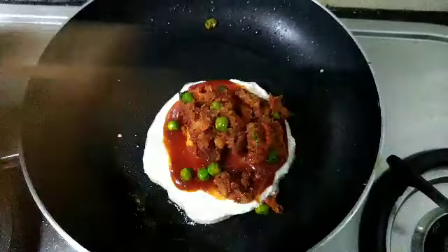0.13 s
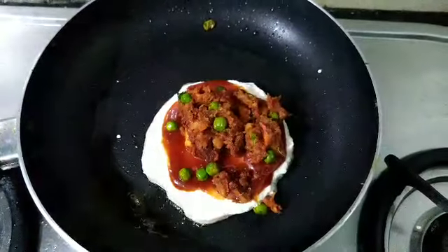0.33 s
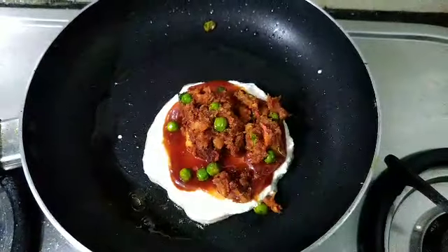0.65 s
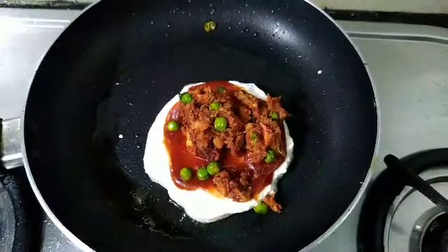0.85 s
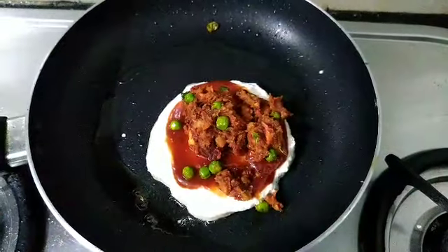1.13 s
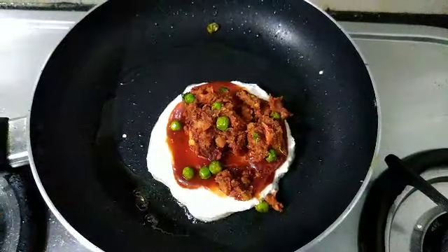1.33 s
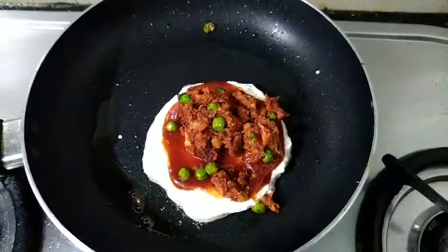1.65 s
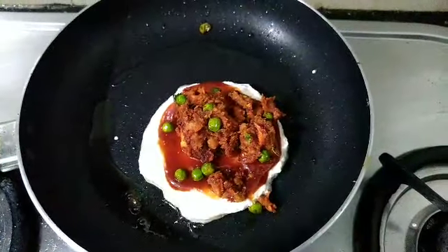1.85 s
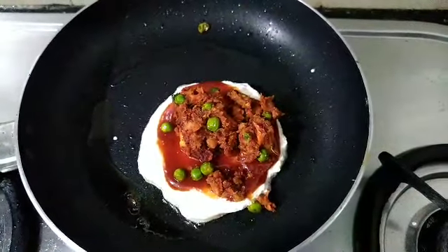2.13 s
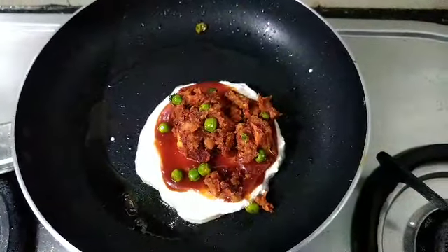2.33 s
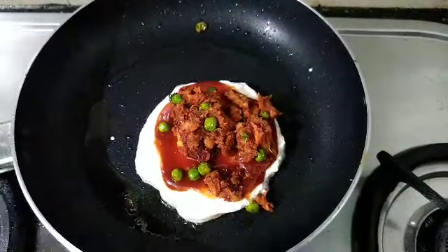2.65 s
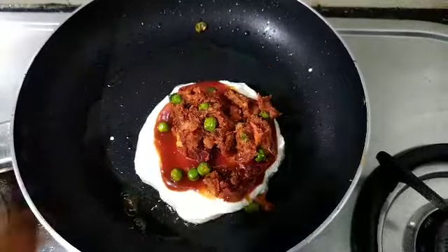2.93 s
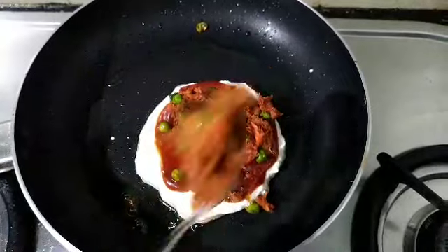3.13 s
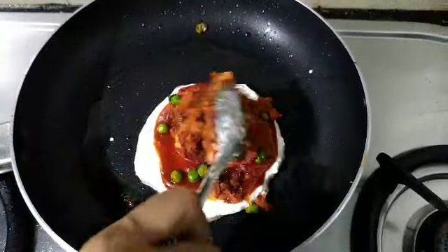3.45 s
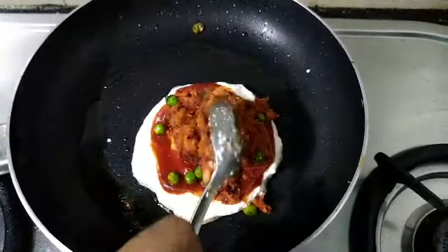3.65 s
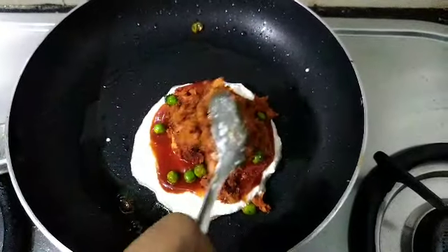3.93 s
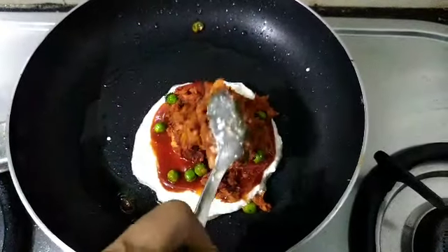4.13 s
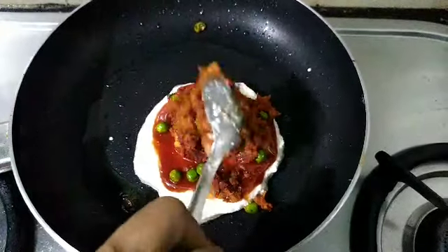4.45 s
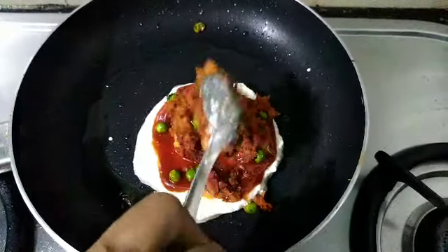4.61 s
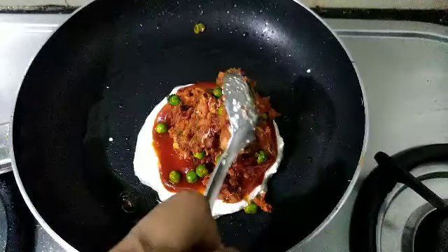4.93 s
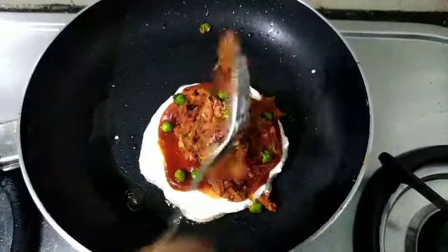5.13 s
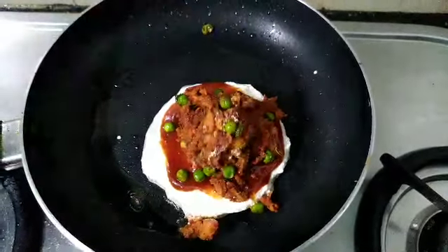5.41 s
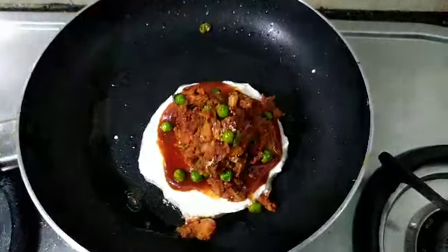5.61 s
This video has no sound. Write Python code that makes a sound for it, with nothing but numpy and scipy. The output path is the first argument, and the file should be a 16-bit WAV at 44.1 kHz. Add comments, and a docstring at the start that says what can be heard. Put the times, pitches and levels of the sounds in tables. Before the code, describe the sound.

Close, bright frying crackle with irregular oil pops, small steam hisses and occasional dull knocks over faint kitchen room rumble.

```python
"""Sharp snaps and sprays of tiny crackles: batter with a moist filling fries close under a phone in a small kitchen.
Water trapped in the oil of a nonstick pan bursts in clicks and random crackle; bubbles and the pan ring with it.
Steam puffs from under the batter as noise and a hollow pitch, and two jets hiss at its edge.
A few dry taps, filtered pulses, sound as the filling is put on and pressed down.
Behind lie noise as room rumble, a faint hum of wavering sines and some hollow blips."""
import sys
import numpy as np
from scipy import signal
from scipy.fft import rfft, irfft, next_fast_len
from scipy.io import wavfile
from scipy.ndimage import uniform_filter1d

SR = 44100
rng = np.random.default_rng(int(sys.argv[2]) if len(sys.argv) > 2 else 0)


def to_wav(s):
    """Save 16-bit WAV."""
    ch = np.atleast_2d(s).T  # columns
    pcm = np.round(np.clip(ch, -1, 1) * 32767)  # PCM
    wavfile.write(sys.argv[1], SR, pcm.astype(np.int16))


N = 254898
TIME = np.arange(N) / SR

# larger water droplets bursting in the oil:
# start_s, snap_peak_db, spray_db (relative), coarse_crackle_db (relative to the spray)
LARGE_DROPLETS = [(0.0024, -19, -32.0, -15), (0.072, -17, -36.5, -4), (0.199, -14, -25.5, -8.5),
                  (0.2622, 0, -32.5, -10), (0.3846, -10, -32.0, -13), (0.4012, -9.5, -35, -16),
                  (0.4455, -9, -34, -7), (0.4846, -3.5, -37, -16), (0.5389, -18, -36.5, -26),
                  (0.566, -14, -41, -8.5), (0.5882, -24, -37, -2), (0.6325, -14, -39, -12.0),
                  (0.6467, -9, -39.5, -15), (0.7129, -25, -38.5, -12), (0.7429, -17, -29.5, -14.0),
                  (0.818, -12, -35.0, -5), (0.8338, -7, -27, -6.5), (0.8833, -16, -31.0, -11),
                  (0.949, -17, -37, -9), (0.9591, -6.5, -32.5, -9), (1.0264, -13.0, -29.5, -19),
                  (1.049, -15, -29.5, -11.5), (1.1139, -14, -34.5, -10), (1.1491, -6.5, -35, -10),
                  (1.2634, -17.0, -44, -25), (1.2794, -15, -31.5, -16), (1.3117, -12, -31, -9.5),
                  (1.3732, -1.5, -35, 0), (1.4509, -19.0, -37.0, -7.0), (1.4803, -26, -34.5, -2.5),
                  (1.554, -4.5, -34, -5.5), (1.6393, -13.5, -34.5, -12), (1.7588, -14.5, -35.5, -9),
                  (1.8017, -14.5, -32.5, -14.5), (1.8725, -5.0, -27, -4), (1.925, -14.5, -33.5, -8.5),
                  (1.9513, -5.5, -31.5, -11), (2.0309, -12, -32.5, -13), (2.1171, -8, -32.5, -15),
                  (2.1602, -13.5, -34, -4), (2.2047, -9, -31.5, -8), (2.2174, -5, -31, -7.5),
                  (2.311, -27, -32.5, -13), (2.3868, -11.5, -42.5, -10), (2.4142, -8.5, -29.5, -8),
                  (2.478, -9.5, -30.5, -13), (2.5776, -13, -29, -13.5), (2.6228, -5, -33.5, -5.5),
                  (2.7227, -11, -29, -23.5), (2.7654, -12, -33, -13.5), (2.815, -9, -33.0, -15),
                  (2.8633, -9, -29.5, -8.5), (2.9524, -29.5, -31, -9.5), (2.9624, -5, -46, -17.5),
                  (3.0816, -12.5, -33.5, -15.0), (3.1343, -23, -27, -20), (3.1945, -4.5, -31.5, -7.5),
                  (3.2686, -14.5, -36.5, -27), (3.321, -5.0, -35.5, -30), (3.3824, -19, -39.5, -15),
                  (3.45, -27, -33.5, -21), (3.5079, -12, -32.5, -21), (3.5886, -22, -35.5, -17),
                  (3.6858, -12, -32.5, -17.5), (3.745, -18, -35.0, -16), (3.9346, -19, -36, -21),
                  (4.0904, -15, -29, -15.5), (4.1541, -5, -30.5, -10), (4.214, -8, -28.5, -14.5),
                  (4.2893, -14.5, -36, -15.5), (4.3573, -9, -30, -13.5), (4.3934, -6, -36, -29),
                  (4.4542, -18, -38.5, -4), (4.4851, -9.5, -38.5, -7), (4.5913, -15, -34, -10.5),
                  (4.6217, -13, -33, -6), (4.6516, -16, -35.5, -4.5), (4.6948, -11, -33, -2.5),
                  (4.7505, -21, -27.5, -12), (4.8515, -19, -31, -13.5), (4.8737, -17.5, -32, -8.5),
                  (4.9651, -23, -38.5, -11.5), (4.9817, -2.5, -29.5, -9), (5.0342, -12, -35, -16),
                  (5.1127, -24.5, -33.5, -21), (5.1982, -4.5, -25, -6.5), (5.3526, -25, -28.5, -29),
                  (5.373, -7.5, -24.5, -21), (5.4007, -11.0, -38, -7), (5.4141, -2.5, -41, 4.5),
                  (5.4791, -7.5, -29.0, -11), (5.5166, -24, -33, -9), (5.6318, -16, -28, -9.5),
                  (5.7001, -30, -30.5, -10.5), (5.7384, -25, -29.5, -8)]
# colour of the coarse crackle: frequency_hz, density_db (per Hz, relative)
COARSE_COLOUR = [(1200, -12.5), (2000, -38.5), (2400, -5.5), (2900, 3.5), (3200, -12.5), (4200, 1),
                 (5400, 6.5), (6400, 5.5), (8000, 11.5), (12000, -44)]
# colour of a snap: frequency_hz, density_db (per Hz, relative)
SNAP_COLOUR = [(1500, -36), (3000, -24.5), (6000, -12.5), (9000, 3), (12000, 0.5), (15000, -4)]

PORT_LAG_S = .00025  # greatest lag between the ports, for a sound from the rim
PORT_PHASE = np.array([[1.5], [0]])  # radians: standing waves in the room meet the ports out of step
PAN_DB = -2  # left over right
SHADE_DB = -14.5  # the left port faces away from the pan


def undb(db):
    """Amplitude ratio of a level in dB."""
    return 10 ** (np.asarray(db) / 20)


def unit(x):
    """Scale to rms 1."""
    return x / np.sqrt(np.mean(x ** 2))


def colour(x, points):
    """Causal minimum-phase filter with the given (Hz, dB) outline."""
    hz, db = np.transpose(points)
    size = 2048
    grid = np.maximum(np.arange(size // 2 + 1) * SR / size, 1)
    cepstrum = irfft(np.log(undb(np.interp(np.log(grid), np.log(hz), db))))
    # folding the cepstrum forward in time makes the response causal
    cepstrum[1:size // 2] *= 2
    cepstrum[size // 2 + 1:] = 0
    response = irfft(np.exp(rfft(cepstrum)))
    return signal.fftconvolve(np.atleast_2d(x), response[None], axes=1)[:, :N]


def fade(t, t60):
    """Amplitude that has lost 60 dB after t60."""
    return np.exp(-np.log(1000) * np.maximum(t, 0) / t60)


def add(track, start, sound):
    """Mix a sound into a track from the start time on."""
    i = max(int(start * SR), 0)
    part = sound[..., :max(N - i, 0)]
    track[..., i:i + part.shape[-1]] += part


def walk(rate):
    """Random wander of rms 1, made of random steps at the given rate per second, smoothed twice."""
    k = int(SR / rate)
    steps = np.repeat(rng.standard_normal(N // k + 1), k)
    smooth = uniform_filter1d(uniform_filter1d(steps, k), k)
    return unit(smooth[:N])


def narrow_noise(hz, rate):
    """Noise around one pitch, as a complex wave: a random flutter carried by a steady tone."""
    flutter = walk(rate) + 1j * walk(rate)
    return flutter * np.exp(2j * np.pi * hz * TIME)


def panned(x, db):
    """Make the left side db louder than the right."""
    return x * undb(np.array([[db], [-db]]) / 2)


def bursts(rows, rise_s):
    """Envelope of (s, dB, t60) blows with a short rise."""
    out, t = np.zeros(N), np.arange(SR // 2) / SR
    for s, db, t60 in rows:
        add(out, s - rise_s, undb(db) * np.minimum(t / rise_s, 1) * fade(t - rise_s, t60))
    return out


def crackle(points, per_s, spread_db, rarest=0.0034):
    """Tiny bursts of very unequal size, up to that of the rarest share, lagging by their place in the pan."""
    count = int(per_s * N / SR)
    when, rank, sign, place = rng.random((count, 4)).T
    size = np.sign(sign - .5) * undb(-spread_db * np.log(np.maximum(rank, rarest)))
    lag = PORT_LAG_S * (2 * place - 1)
    at = (when * N).astype(int)
    ports = np.zeros((2, N))
    np.add.at(ports[0], (at + np.round(lag * SR).astype(int)) % N, size)
    np.add.at(ports[1], at, size)
    return unit(colour(ports, points))


def small_droplets(per_s=25, jitter=1, spread_db=2.5, snap_db=9, snap_spread_db=4, merge_s=0.034):
    """Small droplets boil off at loosely even gaps; one near in time to a large droplet is swallowed by it."""
    # weaker and thinner while the filling is pressed down:
    # time_s, spray_db (relative), coarse_crackle_db (relative to the spray)
    simmer = [(0, -67, -12), (.15, -56, -14), (.6, -41, -10), (2.8, -36, -5.5), (3.4, -44, -28),
              (4.0, -50, -33), (4.6, -44, -24), (5.3, -58, -10), (5.6, -34, -6)]
    count = int(per_s * N / SR) + 1
    size, crack, grain = rng.standard_normal((count, 3)).T
    s = (np.arange(count) + jitter * rng.random(count)) / per_s  # jitter is a share of the mean gap
    times, spray, coarse = np.transpose(simmer)
    spray_db = np.interp(s, times, spray) + spread_db * size
    coarse_db = np.interp(s, times, coarse) + spread_db * grain
    peak_db = spray_db + snap_db + snap_spread_db * crack
    rows = np.column_stack([s, peak_db, spray_db, coarse_db])
    gap_s = np.abs(s[:, None] - np.array(LARGE_DROPLETS)[:, 0]).min(axis=1)
    return rows[gap_s > merge_s]


def boiling(droplets, flash_t60=0.0081, simmer_t60=0.31, body_t60=0.33, simmer_share=0.54, rise_s=0.0056,
            fine_db=-53, coarse_db=-64):
    """Fine and coarse envelopes: droplets flash into steam, then simmer out over a thin fizz, the coarse longer."""
    t = np.arange(SR // 2) / SR

    def power(t60):
        """A short rise, then a quick flash and a slower simmer."""
        flash = (1 - simmer_share) * fade(t - rise_s, flash_t60) ** 2
        simmering = simmer_share * fade(t - rise_s, t60) ** 2
        return np.minimum(t / rise_s, 1) ** 2 * (flash + simmering)

    fine_power, coarse_power = power(simmer_t60), power(body_t60)
    fine, coarse = np.full(N, undb(fine_db) ** 2), np.full(N, undb(coarse_db) ** 2)
    for s, _, db, body_db in droplets:
        add(fine, s - rise_s, undb(db) ** 2 * fine_power)
        add(coarse, s - rise_s, undb(db + body_db) ** 2 * coarse_power)
    return np.sqrt(fine), np.sqrt(coarse)


def shifting(source, flicker_db, flicker_per_s):
    """The colour of a crackle shifts as bubbles of one size or another take over."""
    # bands that flicker separately: low_hz, high_hz
    bands_hz = [(1500, 3300), (3300, 4900), (4900, 7300), (7300, 10000), (10000, 12500), (12500, 16000)]
    out = np.zeros((2, N))
    for edges in bands_hz:
        band = signal.sosfilt(signal.butter(3, edges, "band", fs=SR, output="sos"), source)
        out += band * undb(flicker_db * walk(flicker_per_s))
    return unit(out)


def bubbles(per_s, low_hz, high_hz, ring_t60):
    """Bubbles in the oil ring briefly, each at its own pitch and strength and from its own place."""
    out, t = np.zeros((2, N)), np.arange(SR // 20) / SR
    for when, pitch, strength, place in rng.random((int(per_s * N / SR), 4)):
        hz = low_hz * (high_hz / low_hz) ** pitch
        ring = strength ** 2 * fade(t, ring_t60) * np.sin(2 * np.pi * hz * t)
        add(out[0], when * N / SR + PORT_LAG_S * (2 * place - 1), ring)
        add(out[1], when * N / SR, ring)
    return unit(out)


def pan_ring(t60=0.016):
    """Coarse crackle sets off the lightly ringing modes of the loaded pan."""
    # modes of the pan: pitch_hz, level_db (relative)
    modes = [(2925, -8), (3560, 7), (3843, 3), (4180, 4), (5605, -4.5), (6394, 2.5), (6733, 0)]
    t = np.arange(SR // 10) / SR
    ring = sum(undb(db) * np.sin(2 * np.pi * hz * t) for hz, db in modes) * fade(t, t60)
    source = crackle(COARSE_COLOUR, per_s=3000, spread_db=5)
    return unit(signal.fftconvolve(source, ring[None], axes=1)[:, :N])


def sizzle(fine, coarse):
    """A fine spray and loosely following ticks over coarser crackle, ringing bubbles and the ring of the pan."""
    # colour of the spray: frequency_hz, density_db (per Hz, relative)
    fine_colour = [(2000, -25.5), (4000, -38), (6000, -2), (7500, -3), (8800, 14.5), (9700, 6.5),
                   (11000, 12), (12500, 7), (14000, 0), (15500, 4)]
    spray = shifting(crackle(fine_colour, per_s=5000, spread_db=2.0), flicker_db=1.5, flicker_per_s=70)
    spray = undb(-4 + 0.53 * walk(200)) * spray
    ticks = undb(-12.5) * crackle(SNAP_COLOUR, per_s=170, spread_db=1.5, rarest=0.063)
    body = shifting(crackle(COARSE_COLOUR, per_s=6700, spread_db=2.0), flicker_db=4.0, flicker_per_s=45)
    body = undb(-2 + 1.0 * walk(180)) * body
    rings = undb(-8.5) * bubbles(per_s=350, low_hz=2621, high_hz=6625, ring_t60=0.13)
    rings += undb(-6.5) * pan_ring()
    loose = np.sqrt(fine * fine.mean())  # follows the spray at half its swing in dB
    return (panned(fine * spray, db=PAN_DB) + panned(loose * ticks, db=SHADE_DB)
            + panned(coarse * (body + rings), db=-2.5))


def rumble(side_db=-2):
    """Room rumble: low coloured noise, partly out of phase between the ports."""
    # colour of the room: frequency_hz, density_db (per Hz, relative)
    room_colour = [(20, -1), (70, -5), (125, 13), (170, 6), (240, -2), (340, 6.5), (600, 2.5), (1000, -0.5),
                   (1600, -7), (2200, -16), (5000, -39)]
    # raised while the hand moves over the pan: time_s, level_db
    room_level = [(0, -61.5), (.23, -61.5), (.3, -69), (2.4, -72), (2.7, -66.5), (3.4, -71), (5.3, -65.5),
                  (5.78, -76)]
    mid, side = rng.standard_normal((2, N))
    noise = unit(colour(mid + undb(side_db) * side * np.array([[1], [-1]]), room_colour))
    return noise * undb(np.interp(TIME, *np.transpose(room_level)) + .5 * walk(2.24))


def hum(waver_db=3.5):
    """Sine tones whose phase wanders and whose level swells and wavers."""
    # tones: pitch_hz, level_db (before the swell)
    tones = [(128.3, -67), (199.7, -82)]
    # slow swell: time_s, gain_db
    hum_swell = [(0, 6), (.3, -3), (1.3, -2), (1.6, -8), (2.2, -7), (2.72, 0.5), (3.53, -7), (5.23, -1.5),
                 (5.78, -8)]
    swell_db = np.interp(TIME, *np.transpose(hum_swell))
    out = np.zeros((2, N))
    for hz, db in tones:
        phase = 2 * np.pi * hz * TIME + 0.71 * walk(3.89)
        out += undb(db + swell_db + waver_db * walk(16)) * unit(np.sin(phase + PORT_PHASE))
    return out


def snaps(droplets, ring_t60=0.0097, ring_db=-16, after_db=-13, after_spread_db=0.5, after_s=.014, count=3,
          tilt_db=1):
    """A bursting bubble clicks and the pan scatters it for milliseconds; fragments pop soon after, at uneven gaps."""
    out = np.zeros((2, N))
    size = 2048
    t = np.arange(size) / SR
    hz, outline = np.transpose(SNAP_COLOUR)
    ports = undb([[SHADE_DB], [0]])
    for s, db, _, _ in droplets:
        tilt, strength = rng.standard_normal((2, count))
        delays = np.cumsum(rng.exponential(after_s, count))
        for k in range(count):
            clicks = rng.standard_normal((2, size)) * fade(t, ring_t60) * undb(ring_db) / 2
            clicks[:, :1] = ports
            # some snaps are duller, some brighter: tilt in dB per octave
            shape = np.column_stack([hz, outline + tilt_db * tilt[k] * np.log2(hz)])
            snap = colour(clicks, shape)[:, :size]
            level_db = db + (after_db + after_spread_db * strength[k] if k else 0)
            add(out, s + delays[k] - delays[0], undb(level_db) * snap / np.abs(snap).max())
    return out


def puffs(coarse, hollow_db=-8.0, hiss_db=-5, sputter_db=-30):
    """Steam sputters a little with every droplet, and in a few longer puffs that each sound their own hollow."""
    # steam escaping under the batter: start_s, level_db (relative), t60_s, hollow_pitch_hz
    puff_rows = [(.588, -62.5, 0.17, 1507), (1.372, -54, 0.27, 1400), (1.485, -54.5, 0.12, 1520),
                 (1.754, -57.5, 0.27, 1403), (1.872, -51.5, 0.31, 1560), (2.414, -56, .1, 1555),
                 (4.62, -55, .14, 1580), (5.672, -51, 0.37, 1556)]
    # colour of the steam: frequency_hz, density_db (per Hz, relative)
    puff_colour = [(600, -16.5), (1150, -8.5), (1450, 15.5), (1650, 3.5), (1900, 10), (2400, -27),
                   (4000, -37)]
    hiss = undb(hiss_db) * bursts([row[:3] for row in puff_rows], rise_s=0.004)
    sputter = np.hypot(hiss, undb(sputter_db) * coarse)  # powers add
    out = sputter * undb(2 * walk(70)) * crackle(puff_colour, per_s=2000, spread_db=5.0)
    flutter = walk(450) + 1j * walk(450)  # shared by all the hollows
    for s, db, t60, hz in puff_rows:
        hollow = np.real(flutter * np.exp(2j * np.pi * hz * TIME))
        out += bursts([(s, db + hollow_db, t60)], rise_s=0.0054) * hollow
    return panned(out, db=2)


def taps(gain_db=3.5):
    """Dead knocks: one push of pressure with no ring."""
    # dry taps: start_s, peak_db (before the gain and panning)
    tap_rows = [(0.2606, -24), (1.873, -24.5), (3.321, -31), (5.414, -20.5), (5.479, -33.5)]
    # colour of the push: frequency_hz, gain_db (relative)
    tap_colour = [(40, -9), (150, 2), (400, 7), (850, 7.5), (1500, 3.5), (2500, 7), (5000, 4)]
    push = colour(signal.unit_impulse(N), tap_colour)[0]
    out = np.zeros(N)
    for s, db in tap_rows:
        add(out, s, undb(db + gain_db) * push / push.max())
    return panned(out, db=-19.5)


def blips():
    """Faint hollow blips in the background: narrow, noisy resonances that swell and die."""
    # blips: centre_s, pitch_hz, level_db, length_s
    blip_rows = [(0.636, 953, -66, 0.042), (1.067, 365, -58.5, 0.066), (1.59, 418, -68.5, 0.076),
                 (1.705, 400, -66.5, 0.051), (2.143, 405, -73, 0.062), (2.357, 406, -63.5, 0.1),
                 (3.823, 960, -68, 0.034), (4.093, 539, -72, 0.33), (4.188, 319.4, -62, 0.049),
                 (5.131, 450, -60, 0.039), (5.319, 955, -59.5, 0.12)]
    out = np.zeros((2, N))
    for s, hz, db, length in blip_rows:
        swell = np.exp(-(2 * (TIME - s) / length) ** 2)
        hollow = np.real(narrow_noise(hz, 160) * np.exp(1j * PORT_PHASE / 2))
        out += undb(db) * swell * unit(hollow)
    return out


def jets(flutter_per_s=1600):
    """Steam hissing through a narrow gap at the edge of the batter: a short hiss in one broad band."""
    # jets: start_s, level_db (relative), t60_s, centre_hz
    jet_rows = [(4.146, -50, 0.16, 3160), (4.696, -40.5, .3, 6500)]
    flutter = walk(flutter_per_s) + 1j * walk(flutter_per_s)  # shared by the jets
    out = np.zeros(N)
    for s, db, t60, hz in jet_rows:
        hiss = np.real(flutter * np.exp(2j * np.pi * hz * TIME))
        out += bursts([(s, db, t60)], rise_s=0.0049) * hiss
    return panned(out, db=PAN_DB)


def kitchen(x, wet_db=-12.0, gap_s=0.001394, t60_s=0.17):
    """Hob and tiled walls return a short diffuse tail, different at each port."""
    t = np.arange(SR // 2) / SR
    tail = rng.standard_normal((2, len(t))) * (t > gap_s) * fade(t, t60_s)
    tail /= np.sqrt(np.sum(tail ** 2, axis=1, keepdims=True))
    mono = x.sum(axis=0)[None] / np.sqrt(2)
    return x + undb(wet_db) * signal.fftconvolve(mono, tail, axes=1)[:, :N]


def scene():
    """The pan in its kitchen, with the taps and the background close and without the tail."""
    droplets = np.vstack([LARGE_DROPLETS, small_droplets()])
    fine, coarse = boiling(droplets)
    pan = sizzle(fine, coarse) + snaps(droplets) + puffs(coarse) + jets()
    background = panned(rumble() + hum() + blips(), db=-1)
    return kitchen(pan) + taps() + background


def record(dry, delay_s=18 / 44100, top_hz=15450):
    """The phone subtracts a delayed share of each port from the other, which hollows the centre; it cuts the top."""
    # share taken from the other port: frequency_hz, level_db
    crossfeed = [(150, -20), (1200, -7.5), (2400, 1.5), (4900, -2.5), (7500, -9), (14000, -5)]
    size = next_fast_len(N + SR // 10)
    grid = np.maximum(np.arange(size // 2 + 1) * SR / size, 1)
    hz, db = np.transpose(crossfeed)
    share = undb(np.interp(np.log(grid), np.log(hz), db))
    feed = share * np.exp(-2j * np.pi * grid * delay_s)
    wide = dry - irfft(rfft(dry[::-1], size) * feed, size)[:, :N]
    return signal.sosfilt(signal.ellip(8, .2, 70, top_hz, fs=SR, output="sos"), wide)


dry = scene()
out = record(dry)
to_wav(out)
```